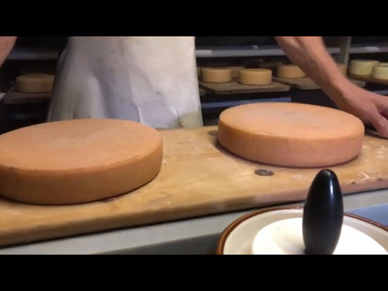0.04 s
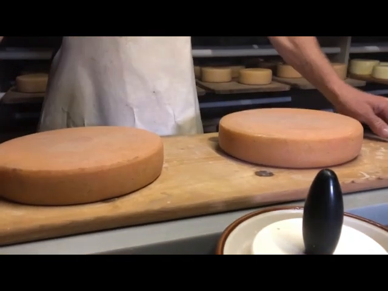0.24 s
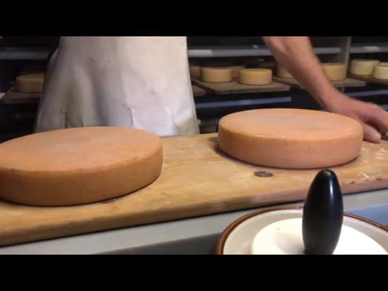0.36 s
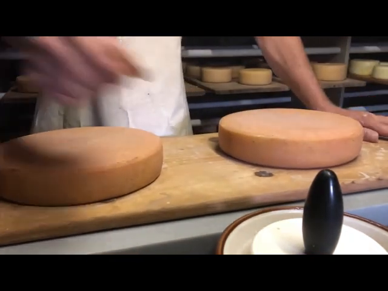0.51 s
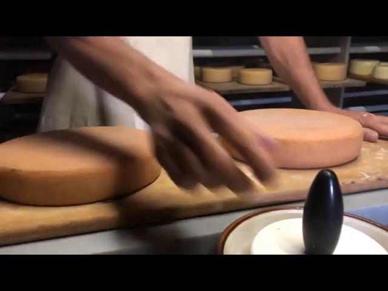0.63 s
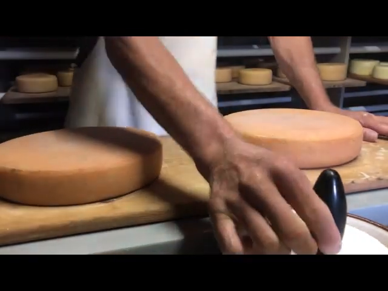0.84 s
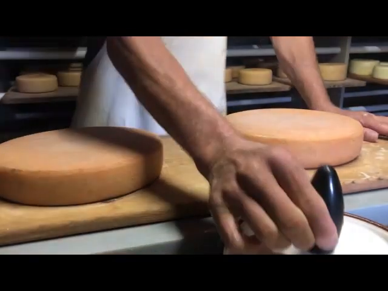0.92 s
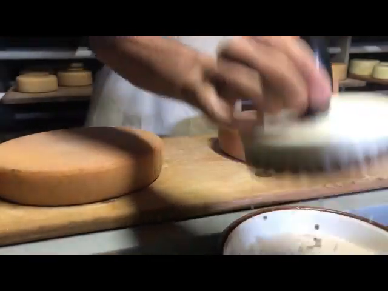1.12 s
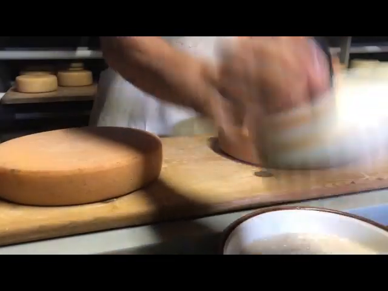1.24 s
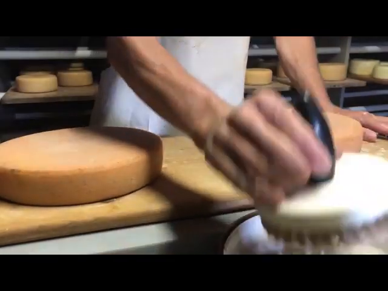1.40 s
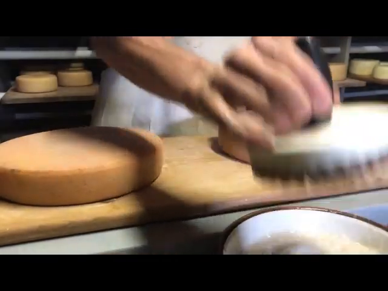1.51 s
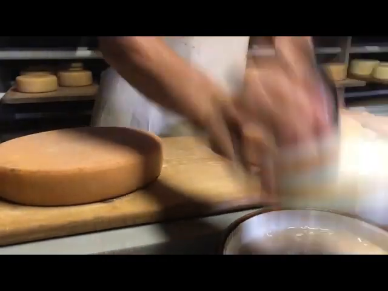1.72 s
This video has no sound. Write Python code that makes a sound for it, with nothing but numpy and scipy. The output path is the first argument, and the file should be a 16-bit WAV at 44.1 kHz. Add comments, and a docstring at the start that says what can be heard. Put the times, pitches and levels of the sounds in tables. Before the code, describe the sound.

A cheese wheel lands on a wooden board: soft padded bumps and low rubbing from 0 s, a hard hollow knock at 0.2 s, then quick rocking thuds with damp smacks and scrapes until 0.4 s. A hand slides away with a faint swish near 0.6 s; low soft bumps follow at 0.75-1.03 s. Bright drips tick from 1.18 s, then a short bubbly spill rings a bowl near 1.48 s. Close, cellar echo, quiet air.

```python
"""A cheese wheel is set down on a wooden board in a cellar, over still air and rubbing.
First soft padded bumps, then one hard knock: the board's modes ring, low-passed by each contact.
The wheel rocks and settles; its damp rind smacks and scrapes as short noise.
A hand slides off with a hiss and swish, then takes a wet brush from a bowl with low, soft tones.
The brush drips ticks and ringing bubbles, then spills: crowded bubbles, spray noise, bowl modes."""
import sys
import numpy as np
from scipy import signal
from scipy.fft import rfft, irfft
from scipy.io import wavfile
from scipy.ndimage import uniform_filter1d

SR = 44100
rng = np.random.default_rng(int(sys.argv[2]) if len(sys.argv) > 2 else 0)


def dump(signal):
    """Clip the signal to [-1, 1] and save it as 16-bit WAV at the path in sys.argv[1]."""
    limited = np.clip(np.atleast_2d(signal).T, -1, 1)
    pcm = np.round(limited * 32767).astype(np.int16)
    wavfile.write(sys.argv[1], SR, pcm)


N = 77175
TIME = np.arange(N) / SR
BUBBLE_GLIDE_PER_S = 2.2  # relative pitch rise of a bubble
HISS_GRAIN_DB = 1.5


def from_db(db):
    """Decibels to gain."""
    return 10 ** (np.asarray(db) / 20)


def rms_one(x):
    """Scale to unit power."""
    return x / np.sqrt(np.mean(x ** 2) + 1e-20)


def at_hz(points, hz):
    """Read a table on a log-frequency axis."""
    f, value = np.transpose(points)
    return np.interp(np.log(np.maximum(hz, 1)), np.log(f), value)


def level(rows):
    """Gain over time from (t/s, level/dB) rows."""
    return from_db(np.interp(TIME, *np.transpose(rows)))


def noise(spectrum):
    """Noise of a given colour above 24 Hz, unit power."""
    hz = np.arange(N // 2 + 1) * SR / N
    white = rfft(rng.standard_normal(N))
    return rms_one(irfft(white * from_db(at_hz(spectrum, hz)) * (hz > 24), N))


def grainy(x, depth_db):
    """Break a hiss into grains of about two milliseconds."""
    grains = rms_one(uniform_filter1d(rng.standard_normal(N), size=80))
    return rms_one(x * from_db(depth_db * grains))


def decay(t60_s):
    """Envelope that loses 60 dB in t60_s."""
    return np.exp(-np.log(1000) * TIME / max(t60_s, 1e-4))


def at(s, x):
    """Start a sound at time s."""
    return np.concatenate([np.zeros(max(int(s * SR), 0)), x])[:N]


def glide_sine(hz, age_s, glide_per_s):
    """Sine whose pitch rises linearly from hz."""
    return np.sin(2 * np.pi * hz * age_s * (1 + glide_per_s * age_s / 2))


def blip(hz, rise_s, t60_s, glide_per_s=0):
    """One damped tone with a soft start and an optional pitch rise."""
    return (1 - np.exp(-TIME / rise_s)) * decay(t60_s) * glide_sine(hz, TIME, glide_per_s)


def ringing(modes):
    """A struck body: decaying sines, each swelling with a time constant of 0.86 cycle."""
    return sum(from_db(db) * blip(hz, 0.86 / hz, t60_s) for hz, db, t60_s in modes)


def bursts(rows, spectrum, t60_s):
    """Short noisy contacts of one colour."""
    return sum(at(s, from_db(db) * noise(spectrum) * decay(t60_s)) for s, db in rows)


def air():
    """Still air: steady noise, strongest in the bass."""
    # f/Hz, relative level/dB per Hz
    air_spectrum = [(25, -6), (45, 4), (100, -7), (280, -1.5), (550, -17), (1200, -26.5), (4000, -27),
                    (9000, -30), (15000, -32)]
    air_db = -63.5
    return from_db(air_db) * noise(air_spectrum)


def cellar(x):
    """Walls and shelves scatter the sound into a dense tail; the treble dies first."""
    # f/Hz, echo level/dB
    echo_level = [(80, -6), (300, -1), (800, -3.5), (2000, -7.5), (4000, -9), (7000, -8), (14000, -8)]
    # f/Hz, t60/s
    echo_t60 = [(100, 0.57), (400, .54), (1000, 0.47), (3000, 0.4), (7000, 0.23), (14000, 0.19)]
    first_echo_s, build_s = 0.005, 0.0013
    hz = np.arange(N // 2 + 1) * SR / N
    coloured = rfft(rng.standard_normal(N)) * from_db(at_hz(echo_level, hz))
    tail = 0
    for centre_hz, t60_s in echo_t60:
        # overlapping bands that sum to one
        share = at_hz([(f, f == centre_hz) for f, _ in echo_t60], hz)
        envelope = decay(t60_s) * (1 - np.exp(-TIME / build_s))
        tail = tail + irfft(coloured * share, N) * envelope / np.linalg.norm(envelope)
    return signal.fftconvolve(x, at(first_echo_s, tail))[:N]


def rubbing():
    """Friction on the board: low rumble noise under a varying level."""
    # t/s, level/dB
    rub_level = [(0, -42.5), (.04, -47), (.1, -53.5), (.2, -51.5), (.45, -60), (.6, -70), (.7, -56.5),
                 (.82, -51.5), (.92, -60.5), (1.01, -53), (1.1, -65.5), (1.4, -69.5), (1.75, -73)]
    # f/Hz, relative level/dB per Hz
    rub_spectrum = [(30, -10), (80, 0), (200, -0.5), (380, 0.5), (520, -8.5), (1000, -9.5), (1400, -24),
                    (3000, -46), (9000, -71)]
    return level(rub_level) * noise(rub_spectrum)


def sliding():
    """Skin and cloth slide with a grainy hiss; fingers slip off the rind with a thin swish."""
    # t/s, level/dB of the hiss
    slide_level = [(0, -56.5), (.07, -63), (.13, -66), (.2, -59.5), (.5, -67.5), (.56, -66), (.62, -62),
                   (.68, -63.5), (.78, -57.5), (.85, -61), (.92, -70), (1, -62), (1.1, -68.5), (1.4, -69.5),
                   (1.7, -85)]
    # hiss: f/Hz, relative level/dB per Hz
    slide_spectrum = [(400, 0), (1700, 4), (3000, -1.5), (6000, -9), (10000, -15.5), (15000, -21)]
    # swish: f/Hz, relative level/dB per Hz
    swish_spectrum = [(1500, -19), (5000, 2), (10000, -2.5), (14000, -4)]
    swish_at_s, swish_width_s, swish_db = 0.598, 0.065, -67
    hiss = level(slide_level) * grainy(noise(slide_spectrum), HISS_GRAIN_DB)
    swell = np.exp(-((TIME - swish_at_s) / swish_width_s) ** 2)
    return hiss + from_db(swish_db) * swell * noise(swish_spectrum)


def bumps():
    """Padded contacts of hands, wheel and brush handle: a few cycles of a low tone each."""
    # t/s, level/dB, f/Hz
    bump_rows = [(.02, -28.5, 302.6), (0.054, -32, 176), (0.132, -31.5, 215), (.349, -22, 275.3),
                 (.418, -34, 187), (.452, -50, 281), (0.752, -32.5, 150.6), (0.779, -37, 202),
                 (.829, -44, 339), (.853, -40, 266), (0.912, -35.5, 123), (.981, -38.5, 199),
                 (1.004, -39.5, 295), (1.028, -50, 251)]
    rise_s, t60_s = 0.0051, 0.07
    return sum(at(s, from_db(db) * blip(hz, rise_s, t60_s)) for s, db, hz in bump_rows)


def taps():
    """Light taps of brush and wheel: short noise bursts."""
    # t/s, level/dB
    tap_rows = [(.148, -48), (.984, -67), (1.387, -58.5)]
    # f/Hz, relative level/dB per Hz
    tap_spectrum = [(200, -9.5), (600, 4.5), (1200, -1.5), (1800, -3.5), (2400, -20.5), (8000, -34.5)]
    return bursts(tap_rows, tap_spectrum, t60_s=0.072)


def drips():
    """Drops from the bristles trap bubbles: damped tones of rising pitch."""
    # t/s, level/dB, f/Hz, t60/s
    drip_rows = [(1.1803, -27, 2535, .018), (1.1885, -37, 2650, 0.04), (1.194, -41.5, 2880, 0.036),
                 (1.19, -41, 4140, 0.013), (1.195, -51, 5780, 0.09), (1.2168, -29.5, 7040, 0.011),
                 (1.218, -48, 3285, 0.068), (1.2175, -43, 5150, 0.023), (1.2395, -36.5, 2517, .022),
                 (1.24, -42, 5240, 0.023), (1.3523, -39, 3177, 0.021), (1.3528, -45, 3880, 0.026),
                 (1.4549, -25, 7300, 0.0056), (1.4836, -35, 5900, 0.014), (1.502, -41, 1005, .05)]
    rise_s = 0.0013
    return sum(at(s, from_db(db) * blip(hz, rise_s, t60_s, BUBBLE_GLIDE_PER_S))
               for s, db, hz, t60_s in drip_rows)


def ticks():
    """Drops tick on the water: noise bursts, each peaked at its own frequency."""
    # t/s, level/dB, centre f/Hz
    tick_rows = [(1.1198, -58, 13000), (1.146, -57, 12000), (1.16, -59, 13000), (1.1742, -55, 11000),
                 (1.1808, -40, 3050), (1.188, -48, 3820), (1.195, -46, 10500), (1.218, -41, 8000),
                 (1.238, -48, 4970), (1.3526, -53.5, 3620), (1.388, -64, 6000), (1.4086, -56.5, 5000),
                 (1.422, -54.5, 4970), (1.437, -55, 12900), (1.4575, -45, 11000), (1.491, -45, 13000),
                 (1.4825, -39, 5070), (1.535, -61, 13000)]
    skirt_db_per_octave, t60_s = -11.5, 0.0096
    out = 0
    for s, db, hz in tick_rows:
        colour = [(hz * 2. ** octave, skirt_db_per_octave * abs(octave)) for octave in range(-2, 3)]
        out = out + bursts([(s, db)], colour, t60_s)
    return out


def bubbles():
    """The spill traps a crowd of ringing bubbles; their pitch falls steeply, then rises a little."""
    # t/s, relative level/dB, middle pitch f/Hz
    spill = [(1.44, -81, 6000), (1.46, -54.5, 4100), (1.466, -56, 3400), (1.472, -45, 2990),
             (1.482, -39, 1860), (1.491, -47, 1500), (1.507, -52.5, 1110), (1.53, -60, 1380),
             (1.6, -87, 1600)]
    bubbles_per_s, cycles_per_t60, low_cut_hz = 1100, 23, 850
    pitch_spread = 0.48  # largest deviation, natural log of pitch
    s, db, pitch_hz = np.transpose(spill)
    count = int(bubbles_per_s * (s[-1] - s[0]))
    crowd = np.zeros(2 * N)
    age_s = TIME[:SR // 25]
    for k, (jitter, size, sign) in enumerate(rng.uniform(-1, 1, (count, 3))):
        born_s = s[0] + (k + jitter / 2) / bubbles_per_s
        hz = np.interp(born_s, s, pitch_hz) * np.exp(pitch_spread * size)
        t60_s = cycles_per_t60 / hz
        # even power whatever the decay and crowding
        density_gain = 2 * np.sqrt(np.log(1000) / (t60_s * bubbles_per_s))
        gain = from_db(np.interp(born_s, s, db)) * density_gain * np.sign(sign)
        ring = np.exp(-np.log(1000) * age_s / t60_s) * glide_sine(hz, age_s, BUBBLE_GLIDE_PER_S)
        start = int(born_s * SR)
        crowd[start:start + len(age_s)] += gain * ring
    low_cut = signal.butter(6, low_cut_hz, "high", fs=SR, output="sos")
    return signal.sosfilt(low_cut, crowd[:N] + 1e-18)


def spray():
    """A crackling puff: grainy noise that swells and fades exponentially."""
    # f/Hz, relative level/dB per Hz
    spray_spectrum = [(100, 6), (430, 13), (560, -16), (750, -25), (950, -8), (3600, 3.5), (4700, -11),
                      (5900, 12), (6550, -3), (7200, 5), (9000, -4), (15000, -3.5)]
    peak_s, rise_s, fall_s, peak_db, grain_db = 1.484, 0.0096, 0.011, -40, 1
    late_s = TIME - peak_s
    puff = from_db(peak_db) * np.exp(np.minimum(late_s / rise_s, -late_s / fall_s))
    return puff * grainy(noise(spray_spectrum), grain_db)


def bowl():
    """The water-filled bowl rings under the spill: decaying modes."""
    # f/Hz, level/dB, t60/s
    bowl_modes = [(39, -52.5, 0.78), (117.7, -41.5, 0.21), (222, -58.5, 1), (875.6, -48.5, 0.23),
                  (950, -45.5, 0.13), (1014, -53.5, 0.13), (1630, -47, 0.17), (2350, -54, 0.3)]
    struck_s = 1.481
    return at(struck_s, ringing(bowl_modes))


def rind():
    """The damp rind smacks on the wood, then scrapes as the wheel settles: noise of one colour."""
    # smacks: t/s, level/dB
    smack_rows = [(.2156, -42), (.2352, -36), (.273, -37), (.3207, -32), (.356, -48)]
    # scrape: t/s, level/dB
    scrape_level = [(.212, -88), (.22, -61), (.25, -49), (.3, -52), (.335, -47), (.38, -56), (.44, -75)]
    # f/Hz, relative level/dB per Hz
    rind_spectrum = [(800, 9.5), (1800, 10), (3800, 5), (5800, -6.5), (7400, -7.5), (9500, -14),
                     (15000, -28)]
    smack_t60_s = 0.037
    scraping = (TIME > scrape_level[0][0]) * (TIME < scrape_level[-1][0])
    scrape = level(scrape_level) * scraping * grainy(noise(rind_spectrum), HISS_GRAIN_DB)
    return bursts(smack_rows, rind_spectrum, smack_t60_s) + scrape


def wheel_on_board():
    """Each blow rings the loaded board; a softer contact leaves out the treble."""
    # t/s, strength/dB, contact low-pass f/Hz
    blows = [(.2152, -1, 6400), (.2218, 2, 950), (.2345, -2, 590), (.2565, -10, 590), (.273, -3.5, 653),
             (.28, -1.5, 650), (.304, -9.5, 460), (0.3202, -13, 1300), (0.386, -13, 300)]
    # board modes: f/Hz, mean level/dB, t60/s
    board_modes = [(75.3, -40, 0.48), (99, -35, 0.34), (116.7, -38.5, .25), (175.9, -39.5, 0.32),
                   (261.6, -39, 0.31), (310, -35.5, .12), (353, -37.5, 0.32), (533.7, -29.5, .17),
                   (580, -33, .12), (667, -23.5, 0.1), (791.5, -23, 0.095), (876.5, -23.5, 0.048),
                   (1087, -26, 0.15), (1874, -24.5, 0.074), (2463, -26, 0.056), (2710, -27.5, 0.013)]
    # dense, short-lived modes as noise: f/Hz, relative level/dB per Hz
    crack_spectrum = [(100, -7), (280, 4), (460, -11.5), (600, 7.5), (850, 2), (1250, -9), (1550, 1.5),
                      (2100, -10), (2750, -4.5), (3500, -16.5), (4300, -11.5), (5800, -36), (15000, -25)]
    crack_db, crack_t60_s = -17.5, 0.043
    mode_spread_db = 3.5  # each blow feeds the modes differently
    out = 0
    for s, db, contact_hz in blows:
        modes = ringing([(hz, mode_db + mode_spread_db * rng.standard_normal(), t60_s)
                         for hz, mode_db, t60_s in board_modes])
        crack = from_db(crack_db) * noise(crack_spectrum) * decay(crack_t60_s)
        contact = signal.butter(2, min(contact_hz, SR / 3), fs=SR, output="sos")
        out = out + at(s, from_db(db) * signal.sosfilt(contact, modes + crack + 1e-18))
    return out


def scene():
    """Impacts and water echo in the cellar; friction and still air are added without echo."""
    wheel = wheel_on_board() + rind()
    water = drips() + ticks() + bubbles() + spray() + bowl()
    direct = wheel + bumps() + taps() + water
    return (direct + cellar(direct) + rubbing() + sliding() + air())[None]


def record(dry):
    """The microphone loses the deepest bass; the top is cut steeply."""
    low_cut_hz, top_hz = 32, 15900
    low_cut = signal.butter(2, low_cut_hz, "high", fs=SR, output="sos")
    top_cut = signal.ellip(10, .2, 70, top_hz, fs=SR, output="sos")
    return signal.sosfilt(top_cut, signal.sosfilt(low_cut, dry))


dry = scene()
out = record(dry)
dump(out)
```